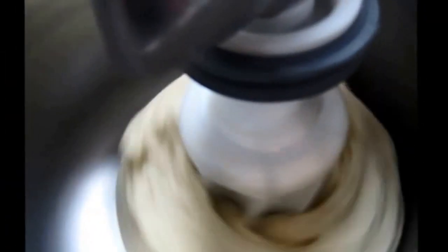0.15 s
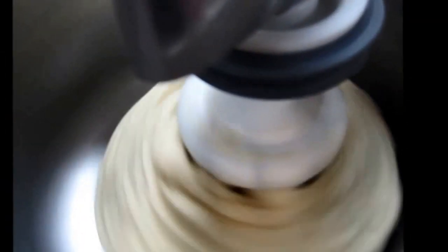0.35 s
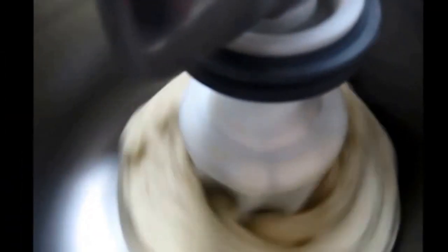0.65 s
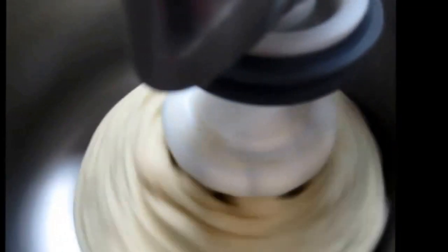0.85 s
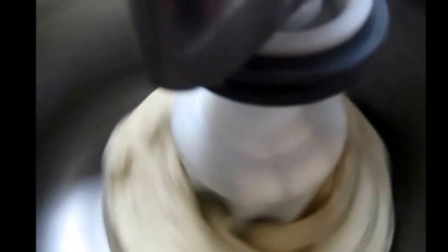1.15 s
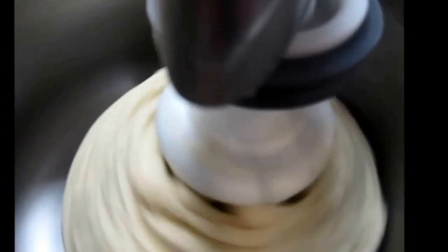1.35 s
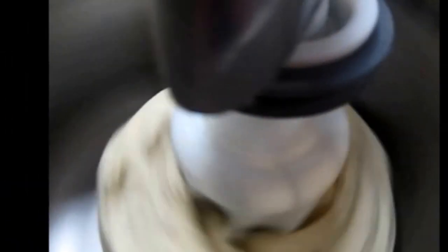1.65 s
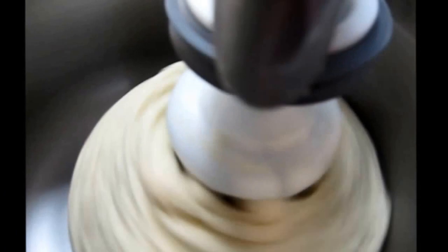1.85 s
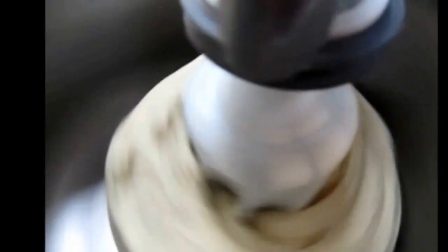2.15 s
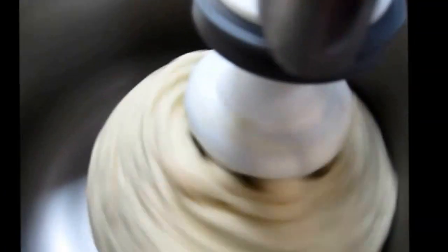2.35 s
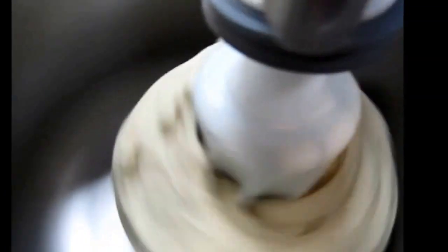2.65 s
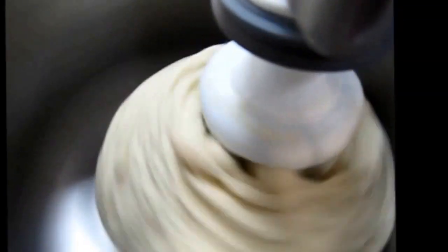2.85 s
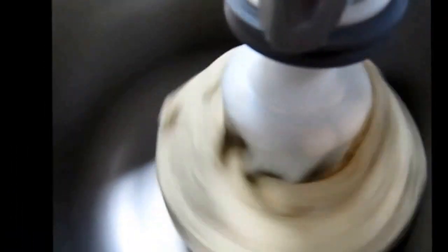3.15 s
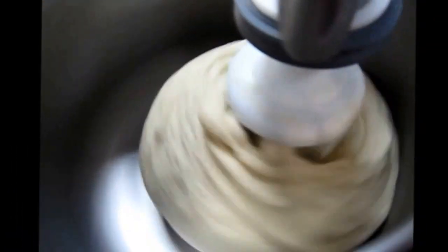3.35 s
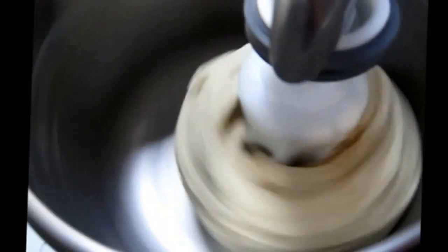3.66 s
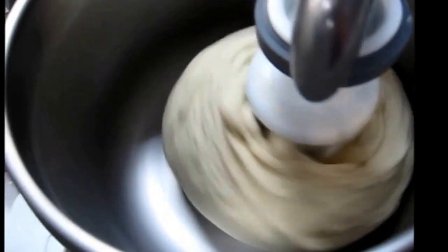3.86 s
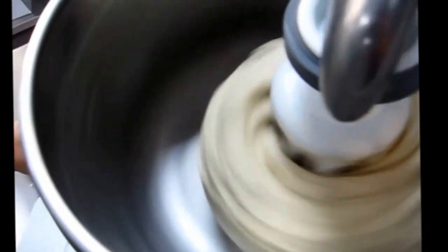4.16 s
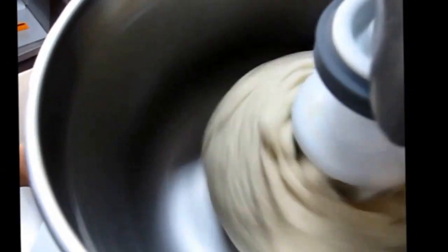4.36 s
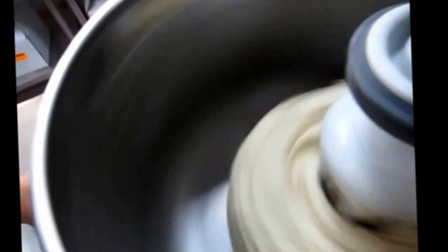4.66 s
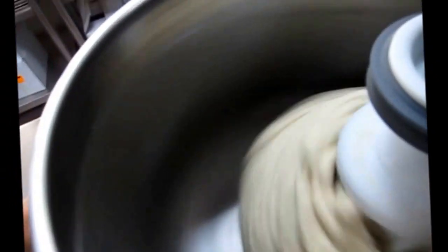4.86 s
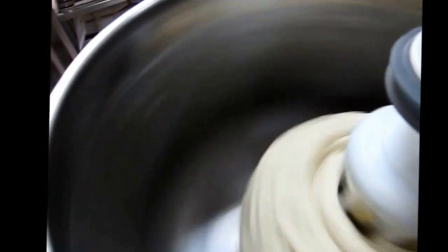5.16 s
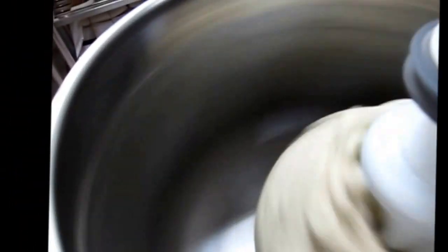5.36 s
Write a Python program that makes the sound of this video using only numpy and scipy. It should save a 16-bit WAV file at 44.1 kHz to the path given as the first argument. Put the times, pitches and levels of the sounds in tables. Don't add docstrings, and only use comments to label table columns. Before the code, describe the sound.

A dough mixer drones and whines close by, its pitch sagging about twice a second, each turn marked by a short hollow buzzing knock.

```python
import sys
import numpy as np
from scipy import signal
from scipy.fft import rfft, irfft
from scipy.io import wavfile
from scipy.ndimage import uniform_filter1d, map_coordinates

SR = 44100
rng = np.random.default_rng(int(sys.argv[2]) if len(sys.argv) > 2 else 0)


def decibels_to_gain(level_db):
    exponent = np.asarray(level_db, float) / 20
    return 10 ** exponent


def unload_audio(sound):
    columns = np.transpose(np.atleast_2d(sound))
    steps = np.round(np.clip(columns, -1, 1) * 32767)
    wavfile.write(sys.argv[1], SR, steps.astype(np.int16))


N = 242991

# heaviest_load_s, sag_hz (eighth rotor overtone), growl_db,
# drone_db (free run after it)
TURNS = [(-.04, 36, -32, -14), (0.46, 44.1, -24, -15), (.986, 43, -27, -17), (1.497, 42.18, -27, -16.5),
         (2.012, 37.8, -26.5, -16), (2.507, 41.75, -28, -14.5), (3.048, 48.2, -25.5, -15.5),
         (3.571, 42.92, -33, -17), (4.132, 35.69, -30, -16), (4.685, 30.95, -29, -14.5),
         (5.244, 35.12, -27.5, -14), (5.79, 35, -48, -17)]
# turn_share, level_db
DRONE_TURN = [
    (0, -5.5),
    (.24, -5.5),
    (.4, -1.5),
    (.74, 0),
    (.92, -8),
    (1, -7.5),
]
# orders (multiples of rotor speed), then level_db
ROTOR_ORDERS = [1, 2, 4, 10, 11, 12, 13, 14, 15, 16, 17, 18, 20, 24, 25, 30, 48, 59, 60, 72, 96]
ROTOR_DB = [-31.5, -33, -45, -57, -52, -48, -51, -56, -56, -65, -64, -57, -61, -62, -61, -70, -80, -79, -79,
            -71, -78]
# orders (multiples of belt speed), then level_db
BELT_ORDERS = [2, 6, 8, 9, 10, 11, 12, 15, 16]
BELT_DB = [-58, -35, -37, -30, -39, -38, -51, -54, -53]
# orders (multiples of gear speed), then level_db
GEAR_ORDERS = [1, 3, 4, 5, 6, 7, 8, 12, 13, 14, 15, 16, 17, 18, 22, 23]
GEAR_DB = [-64, -42, -38, -47, -43, -39, -40, -48, -43, -43, -40, -41, -48, -46, -54, -51]
MAINS_DB = [-50.5, -26.5]
SIDEBAND_DB = {-1: -57, 1: -38, 2: -40.5, 3: -43, 4: -51}
# time_s, whine_gain_db
VENT = [(0, 3.0), (.6, 2.5), (1.0, -1.5), (1.45, -4.0), (1.9, -2.5), (2.4, -2.5), (2.8, .5), (3.3, .5),
        (3.75, 2.5), (4.2, .5), (4.7, -.5), (5.5, -.5)]
# full_swell_s, peak_db, pitch_hz, rise_s, hold_s
KNOCKS = [(0.233, -14.5, 767, .01, 0.02), (0.746, -11.5, 772, 0.01, 0.028), (1.275, -10, 770, 0.021, 0.012),
          (1.792, -13, 768, 0.025, 0.027), (2.313, -14, 766, 0.019, 0.055), (2.839, -16, 765, 0.021, 0.045),
          (2.932, -17.5, 783, 0.016, 0.0055), (3.359, -15, 765, 0.013, 0.039),
          (3.876, -14.5, 763, 0.012, 0.044), (4.41, -10.5, 761.6, 0.024, 0.046),
          (4.929, -12.5, 761, 0.021, 0.045), (5.46, -9, 760, 0.0099, 0.038)]
# centre_hz, width_hz, level_db
CASING = [(766, 310, -1), (652, 43, 2.5)]
# centre_hz, width_hz, level_db
GROWL = [(882, 9.3, -2), (947.7, 33, -1.5), (963, 21, -2)]
# time_s, level_db
NEAR = [(0, -40), (.6, -38), (1.2, -39), (1.8, -40), (2.5, -39.5), (3.2, -39.5), (3.9, -40), (4.7, -37.5),
        (5.51, -37)]
# pitch_hz, density_db_per_hz
HISS = [(1350, -43), (2300, -11), (2570, -11), (2880, -11), (3290, -12), (3860, -8), (5400, -16),
        (6800, -22), (7660, -26), (8230, -43), (8500, -34), (9060, -27), (10400, -24.5), (13400, -30.5),
        (15400, -31)]
# centre_hz, width_hz, level_db
HISS_MODES = [(2870, 230, -0.5), (3077, 65, 2), (3520, 91, 3), (3975, 35, 4.5), (4930, 110, 1.5),
              (11200, 340, 0)]
# pitch_hz, density_db_per_hz
BODY = [(20, -43), (45, -35.5), (110, -30.5), (150, -24), (200, -11), (275, -19.5), (350, -15),
        (430, -21.5), (580, -24.5), (830, -20), (970, -18.5), (1050, -26), (1600, -29.5), (2300, -30),
        (2700, -57), (4000, -94)]
# centre_hz, width_hz, level_db
HOUSING = [(154.5, 13, 15), (508, 37, 4.5), (1300, 460, 3), (1850, 180, 4.5), (2020, 190, 5),
           (2366, 48, 12.5)]
# centre_hz, width_hz, level_db
MURMUR = [(764.6, 15.7, 0.5), (796, 19, -0.5)]
# centre_hz, width_hz, level_db
RUMBLE = [(302.5, 18, -2), (381.9, 15.4, 4.5), (399.1, 11.5, 1.5)]
# time_s, pitch_hz, level_db
GROAN = [
    (2.82, 130, -65),
    (2.855, 118, -39),
    (2.9, 104, -36.5),
    (2.96, 94, -38),
    (3.0, 86, -62),
]
# pitch_hz, correlation
LIKENESS = [(60, 1), (190, 0.97), (400, 0.84), (800, 0.88), (1400, 0.76), (2200, 0.55), (3500, 0.32),
            (6000, 0.26), (10000, 0.22), (15000, 0.18)]
# pitch_hz, left_minus_right_db
BALANCE_DB = [(60, -2), (99, -0.5), (160, 2), (270, 0.5), (450, 2), (740, 1), (1220, -1.5), (2010, -0.5),
              (3330, 1), (5500, 3.5), (9080, 0), (15000, 2.5)]
# pitch_hz, lead_radians
LEAD = [(60, -.03), (190, -.07), (770, -.22), (1550, -.15), (2150, -.55), (3500, -.7), (4500, -2.0),
        (5800, -3.0), (9400, -3.9), (11300, -5.2), (15200, -6.2)]
# time_s, left_minus_right_db
TURNING = [
    (0.0, 0.1),
    (1.52, 0.6),
    (5.51, -0.5),
]
# low_hz, high_hz
GAP_HZ = [8430, 8505]

MAINS_HZ, TOP_HZ = 120.1, 15750
BELT_RATIO, GEAR_RATIO = .23665, .3216
FREE_HZ, SLOWING_HZ_PER_S, SAG_SHARPNESS = 1273.6, 1.6, 3.9
WHINE_DB = -38.5
GROWL_SWING_DB, GROWL_SHARPNESS = 13.5, 1.27
GROWL_LEAD, GROWL_CATCH_DB = 0.042, 1.5
RUMBLE_DB, RUMBLE_WAVER_DB = -33, 3.5
MURMUR_DB, MURMUR_DAMPED_DB, MURMUR_FREE_DB, MURMUR_WAVER_DB = -29, 8, 5, 1.0
EVEN_SHARE, EVEN_S = .6, .06
BODY_DB, BODY_FOLLOWS, BODY_WAVER_DB = -27.5, 0.99, 1
FAN_SWING_DB, FAN_TOP_HZ, FAN_LAG = 2, 6000, 0.032
DUCK_FROM_DB, DUCK_SHARE, DUCK_S, RECOVER_S = -16.5, 0.76, 0.018, 0.44
SETTLE_S, SUSTAIN_DB, HOLD_LOSS_DB_PER_S, LET_GO_S = 0.011, -16, 52, 0.01


def in_time(rows):
    s, *columns = np.transpose(rows)
    return [np.interp(np.arange(N) / SR, s, c) for c in columns]


def at_hz(points, hz):
    table_hz, values = np.transpose(points)
    return np.interp(np.log(hz), np.log(table_hz), values)


def spectrum_hz():
    return np.maximum(np.arange(N // 2 + 1) * SR / N, 1)


def rms_one(x):
    return x / np.sqrt(np.mean(x ** 2) + 1e-20)


def drift(rate):
    r = np.exp(-80 * np.pi * rate / SR)
    chance = rng.standard_normal(N // 40 + 2002)
    slow = signal.lfilter([1], [1, -2 * r, r * r], chance)[2000:]
    return np.interp(np.arange(N) / 40, np.arange(len(slow)), rms_one(slow))


def lobe(turn, sharpness, lag=0):
    return np.abs(np.cos(np.pi * (turn - lag))) ** sharpness


def resonances(x, modes):
    out = 0
    for k, (hz, width, db) in enumerate(modes):
        r = np.exp(-np.pi * width / SR)
        feed = np.array([1, 0, -1]) * (1 - r * r) / 2
        ring = [1, -2 * r * np.cos(2 * np.pi * hz / SR), r * r]
        out = out + (-1) ** k * decibels_to_gain(db) * signal.lfilter(feed, ring, x)
    return out


def tone(phase, db, flutter, wander):
    start = rng.uniform(0, 2 * np.pi)
    level = np.sqrt(2) * decibels_to_gain(db) * np.exp(flutter * drift(4.8))
    return level * np.sin(phase + start + wander * drift(10.4))


def stereo_noise(spectrum, modes=()):
    hz = spectrum_hz()
    power = decibels_to_gain(2 * at_hz(spectrum, hz))
    for centre_hz, width, db in modes:
        power = power * (1 + decibels_to_gain(2 * db) / (1 + (2 * (hz - centre_hz) / width) ** 2) ** 2)
    mid, side = rfft(rng.standard_normal((2, N)))
    alike = np.clip(at_hz(LIKENESS, hz), -1, 1)
    pair = np.sqrt(1 + alike) * mid + np.sqrt(1 - alike) * side * [[1], [-1]]
    return rms_one(irfft(np.sqrt(power) * pair, N))


def patchy(x, patchy_db, span_s, span_hz):
    hz, s, cells = signal.stft(x, SR, nperseg=1024)
    where = np.meshgrid(hz / span_hz, s / span_s, indexing="ij")
    field = map_coordinates(rng.standard_normal((400, 200)), where, order=1, mode="mirror")
    return signal.istft(cells * decibels_to_gain(patchy_db * field), SR, nperseg=1024)[1][:, :N]


def groan():
    hz, db = in_time(GROAN)
    return tone(2 * np.pi * np.cumsum(hz) / SR, db, flutter=0.036, wander=.2)


def mains_phase():
    return 2 * np.pi * MAINS_HZ * np.arange(N) / SR


def mains_hum():
    mains = mains_phase()
    return sum(tone((k + 1) * mains, db, flutter=0.094, wander=0.029) for k, db in enumerate(MAINS_DB))


def shaken(modes):
    out = 0
    for mode in modes:
        once = resonances(rng.standard_normal(N), [mode])
        out = out + resonances(once, [(mode[0], 1.1 * mode[1], 0)])
    return rms_one(out)


def evened(x):
    power = uniform_filter1d(x ** 2, size=int(EVEN_S * SR))
    return rms_one(x / (power / power.mean() + .1) ** (EVEN_SHARE / 2))


def panel_rumble():
    return shaken(RUMBLE) * decibels_to_gain(RUMBLE_DB + RUMBLE_WAVER_DB * drift(5.1))


def panel_murmur(turn, load):
    db = MURMUR_DB - MURMUR_DAMPED_DB * load - MURMUR_FREE_DB * lobe(turn, 13.0, 0.52)
    return evened(shaken(MURMUR)) * decibels_to_gain(db + MURMUR_WAVER_DB * drift(14.0))


def body_noise(gain_db):
    db = BODY_DB + BODY_FOLLOWS * gain_db + BODY_WAVER_DB * drift(3.8)
    return decibels_to_gain(db) * stereo_noise(BODY, HOUSING)


def fan_hiss(rotor, turn, hiss_db):
    sparking = 1 + .03 * np.cos(GEAR_RATIO * rotor)
    hiss = decibels_to_gain(hiss_db + 3.5) * sparking * stereo_noise(HISS, HISS_MODES)
    highpass = signal.butter(2, FAN_TOP_HZ, "high", fs=SR, output="sos")
    top = signal.sosfiltfilt(highpass, hiss)
    top_gain = decibels_to_gain(FAN_SWING_DB * (.5 - lobe(turn, 2.9, FAN_LAG)))
    return hiss + (top_gain - 1) * top


def ducking():
    t, out = np.arange(N) / SR, np.zeros(N)
    for s, db, *_ in KNOCKS:
        since = np.maximum(t - s, 0)
        depth_db = DUCK_SHARE * max(db - DUCK_FROM_DB, 0)
        out -= depth_db * (1 - np.exp(-since / DUCK_S)) * np.exp(-since / RECOVER_S)
    return out


def knocks():
    t, out = np.arange(N) / SR, np.zeros(N)
    wobble, grit = .3 * drift(25), .35 * rng.standard_normal(N)
    for s, db, hz, rise, hold in KNOCKS:
        held_db, settle = min(db, SUSTAIN_DB), min(SETTLE_S, hold / 2)
        times = [s - rise, s, s + settle, s + hold, s + hold + LET_GO_S]
        heights = [0, decibels_to_gain(db), decibels_to_gain(held_db), decibels_to_gain(held_db - HOLD_LOSS_DB_PER_S * hold), 0]
        swell = np.interp(t, times, heights)
        out += swell * (np.sin(2 * np.pi * hz * t + wobble) + grit)
    return decibels_to_gain(2.0) * resonances(out, CASING)


def growl(rotor, growl_db):
    gate = 1 + 0.77 * np.cos(GEAR_RATIO * rotor + 1.8 * drift(5.8))
    rub = resonances(gate * rng.standard_normal(N), GROWL)
    rub = resonances(rub, [(887, 270, 0)])
    squeal = tone(6 * rotor, growl_db - 2.5, flutter=.12, wander=.2)
    tooth = tone(18 * GEAR_RATIO * rotor, growl_db - 8, flutter=.2, wander=.3)
    return squeal + tooth + decibels_to_gain(growl_db - 5.5) * rms_one(rub)


def belt_and_gears(rotor):
    out = 0
    for ratio, orders, levels in [(BELT_RATIO, BELT_ORDERS, BELT_DB), (GEAR_RATIO, GEAR_ORDERS, GEAR_DB)]:
        for k, db in zip(orders, levels):
            out = out + tone(ratio * k * rotor, db, flutter=.2, wander=0.29)
    return out


def housing_drone(rotor, drone_db):
    return tone(5 * BELT_RATIO * rotor, drone_db - .3, flutter=0.05, wander=0.052)


def motor_whine(rotor):
    mains = mains_phase()
    out = tone(8 * rotor, WHINE_DB, flutter=0.19, wander=0.068)
    for k, db in zip(ROTOR_ORDERS, ROTOR_DB):
        out += tone(k * rotor, db, flutter=0.16, wander=0.21)
    for k, db in SIDEBAND_DB.items():
        out += tone(12 * rotor + k * mains, db, flutter=0.035, wander=0.066)
    return out


def at_ports(sound):
    hz = spectrum_hz()
    left = decibels_to_gain(at_hz(BALANCE_DB, hz) / 2) * np.exp(.5j * at_hz(LEAD, hz))
    pan_db, = in_time(TURNING)
    return irfft(rfft(sound) * [left, 1 / left], N) * decibels_to_gain(pan_db * [[.5], [-.5]])


def scene():
    t = np.arange(N) / SR
    load_s, sag_hz, growl_top_db, drone_top_db = np.transpose(TURNS)
    turn_number = np.arange(len(TURNS))
    turn = np.interp(t, load_s, turn_number)

    load = lobe(turn, SAG_SHARPNESS)
    sag = sag_hz[np.round(turn).astype(int)] * load
    eighth_hz = FREE_HZ - SLOWING_HZ_PER_S * t - sag
    rotor = 2 * np.pi * np.cumsum(eighth_hz / 8) / SR

    free_run_db = np.interp(turn - .5, turn_number, drone_top_db)
    drone_db = free_run_db + np.interp(turn % 1, *np.transpose(DRONE_TURN))
    strain = lobe(turn, GROWL_SHARPNESS, -GROWL_LEAD)
    growl_db = np.interp(t, load_s, growl_top_db) - GROWL_SWING_DB * (1 - strain)
    growl_db += GROWL_CATCH_DB * drift(18.0)

    hiss_db = in_time(NEAR)[0] + ducking()
    gain_db = hiss_db - hiss_db.mean()
    vent_db, = in_time(VENT)

    noise = body_noise(gain_db) + fan_hiss(rotor, turn, hiss_db)
    sound = patchy(noise, patchy_db=2.5, span_s=.15, span_hz=70.16)
    sound = sound + groan() + panel_rumble() + panel_murmur(turn, load)
    sound += knocks() + growl(rotor, growl_db)
    sound += decibels_to_gain(0.13 * gain_db) * (mains_hum() + belt_and_gears(rotor))
    sound += housing_drone(rotor, drone_db) + decibels_to_gain(vent_db) * motor_whine(rotor)
    return at_ports(sound)


def band_limit(x):
    return signal.sosfilt(signal.butter(12, 15600, fs=SR, output="sos"), x)


def record(dry):
    gap = signal.cheby2(4, 30, GAP_HZ, "bandstop", fs=SR, output="sos")
    top = signal.cheby2(10, 40, TOP_HZ, fs=SR, output="sos")
    return band_limit(signal.sosfilt(np.vstack([gap, top]), dry))


dry = scene()
out = record(dry)
unload_audio(out)
```